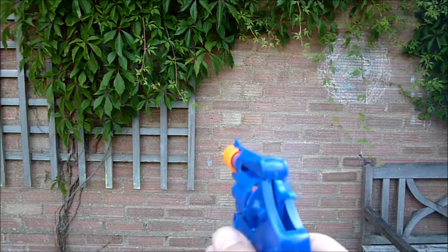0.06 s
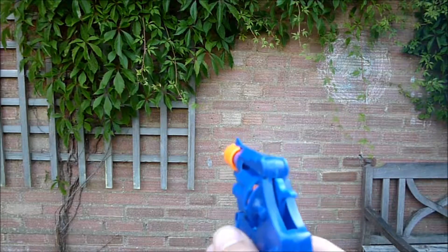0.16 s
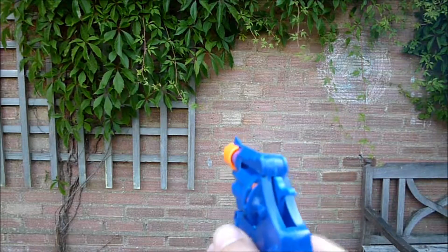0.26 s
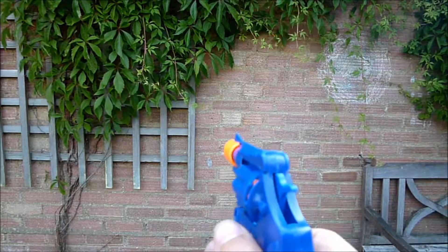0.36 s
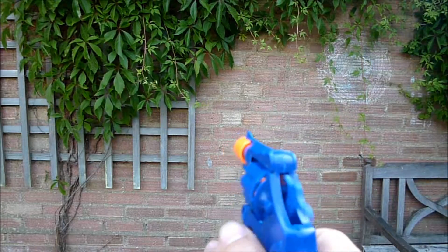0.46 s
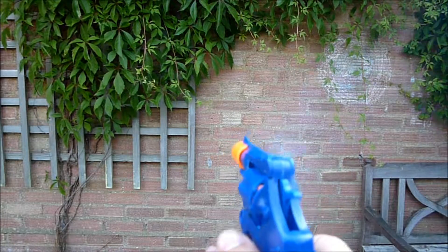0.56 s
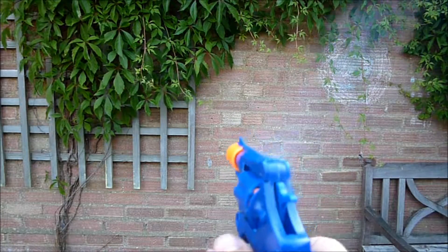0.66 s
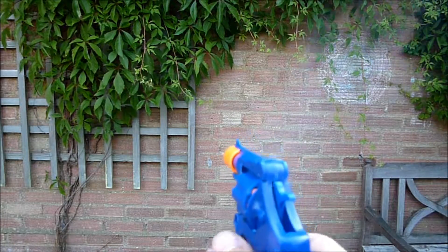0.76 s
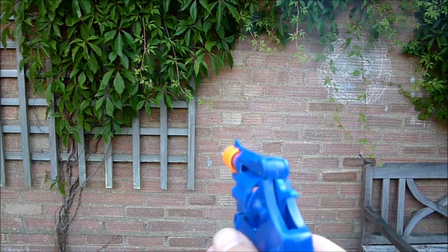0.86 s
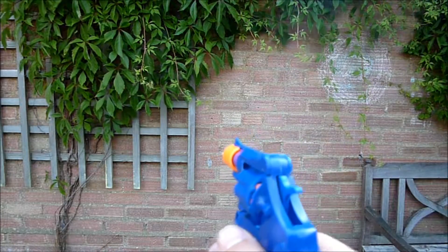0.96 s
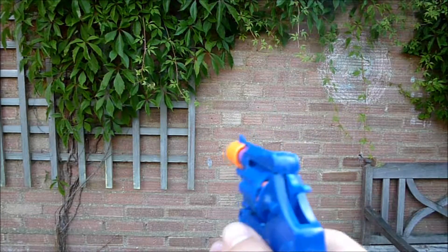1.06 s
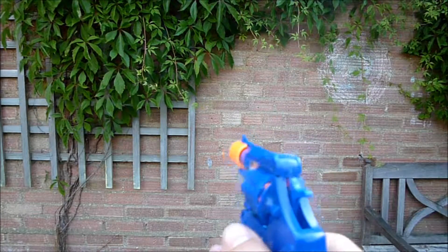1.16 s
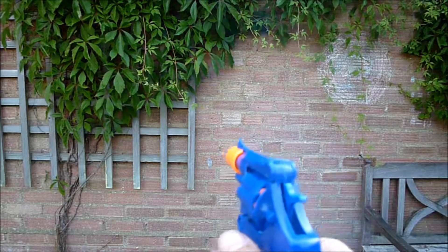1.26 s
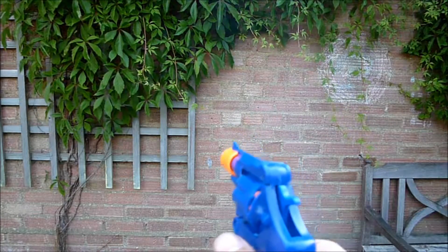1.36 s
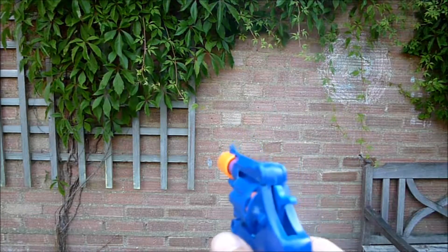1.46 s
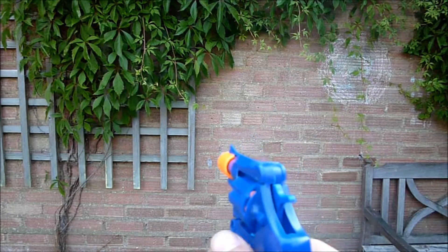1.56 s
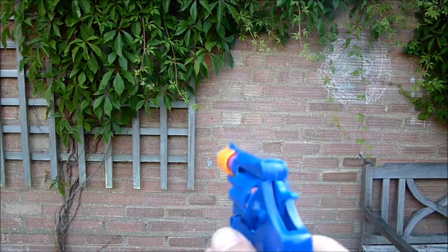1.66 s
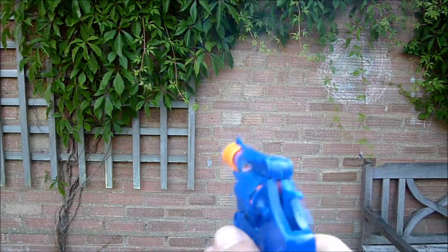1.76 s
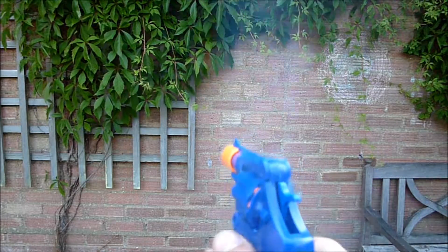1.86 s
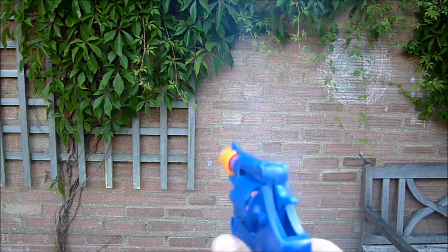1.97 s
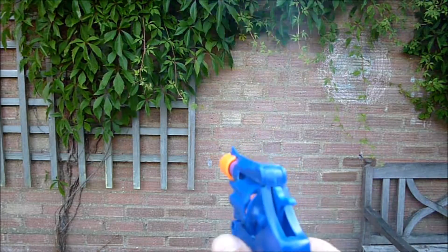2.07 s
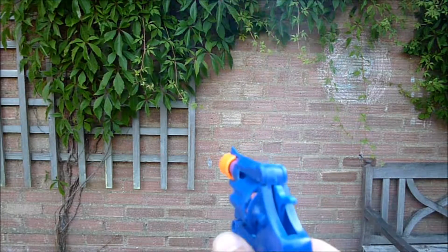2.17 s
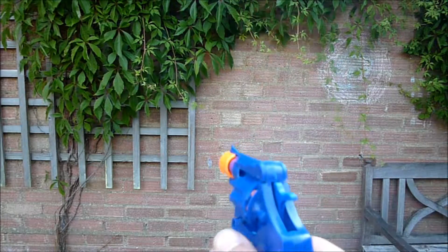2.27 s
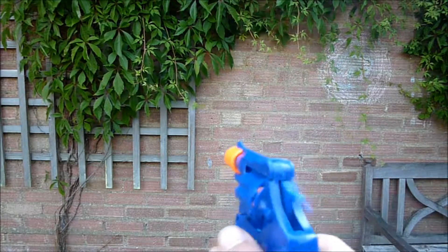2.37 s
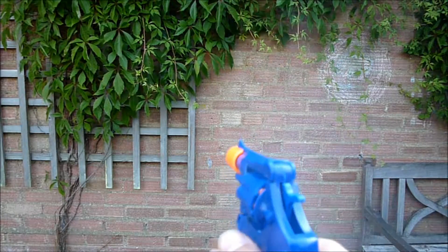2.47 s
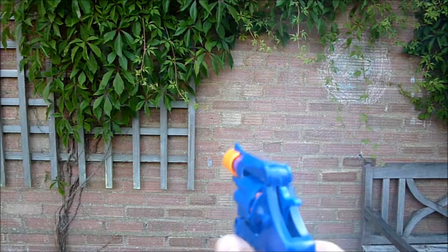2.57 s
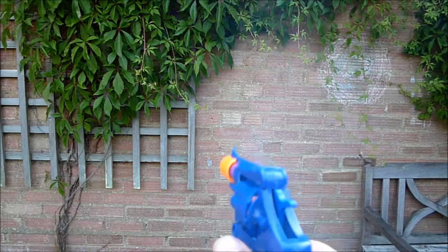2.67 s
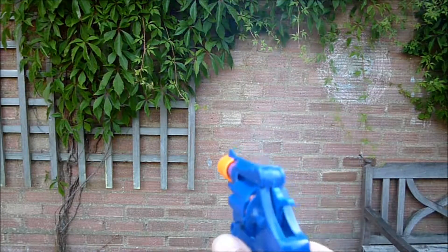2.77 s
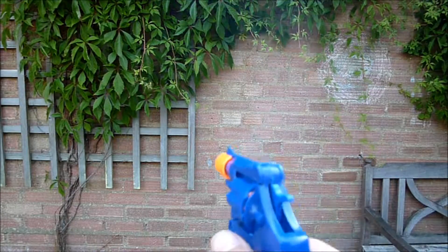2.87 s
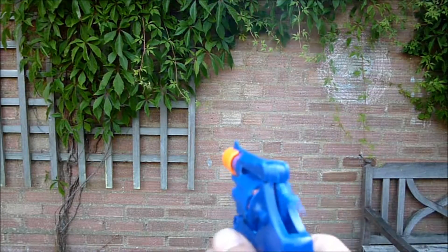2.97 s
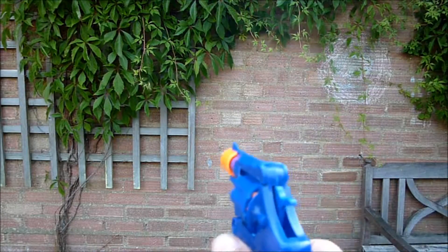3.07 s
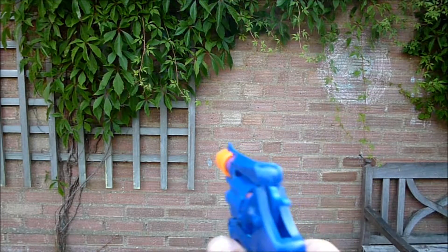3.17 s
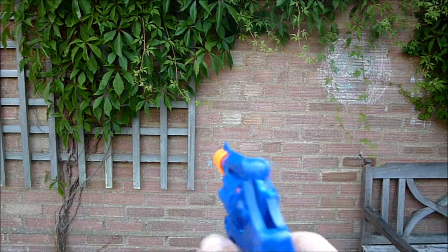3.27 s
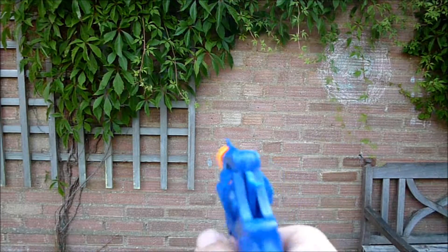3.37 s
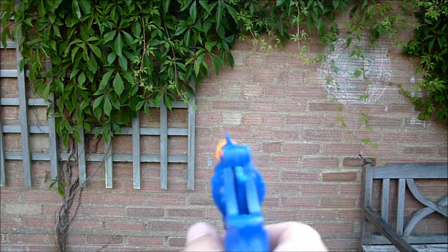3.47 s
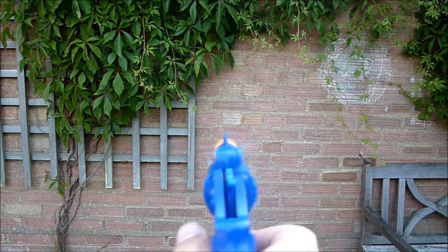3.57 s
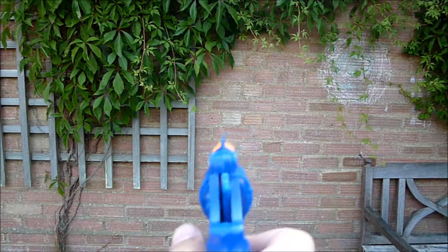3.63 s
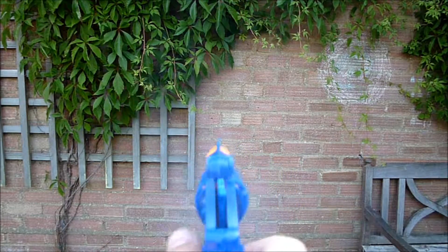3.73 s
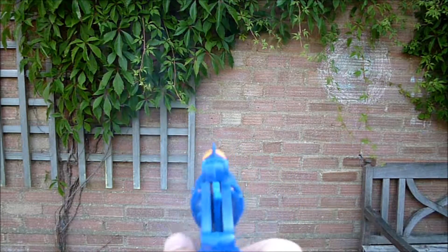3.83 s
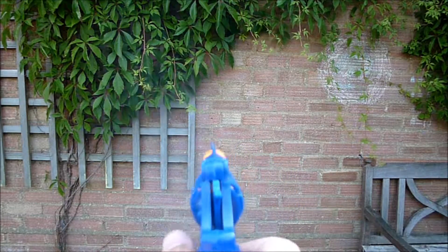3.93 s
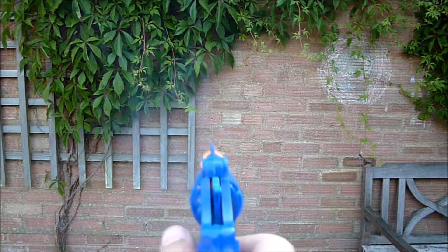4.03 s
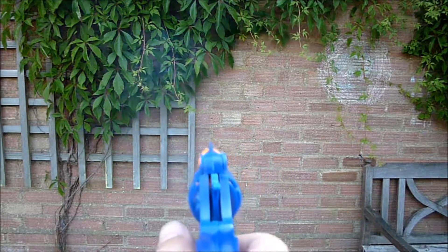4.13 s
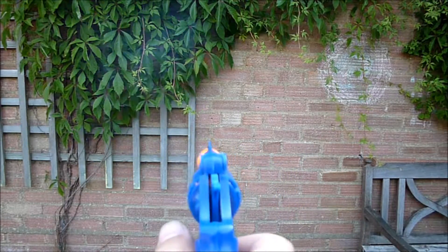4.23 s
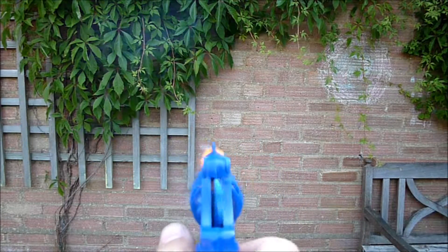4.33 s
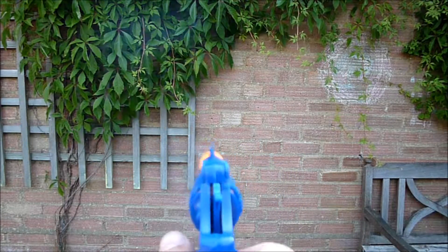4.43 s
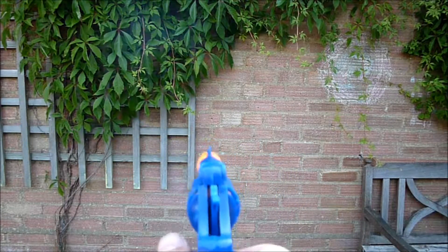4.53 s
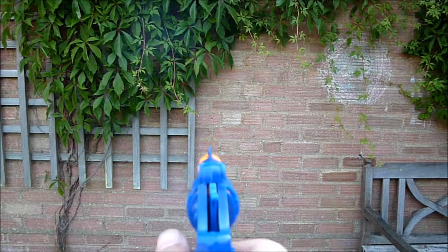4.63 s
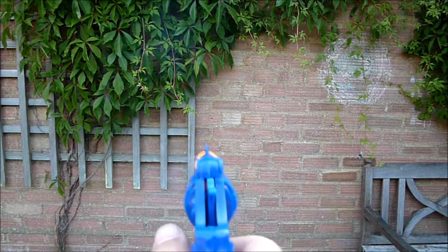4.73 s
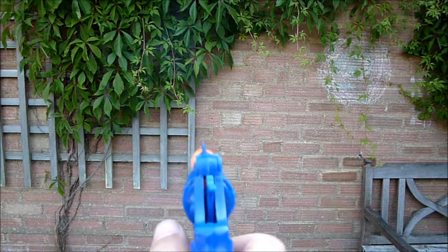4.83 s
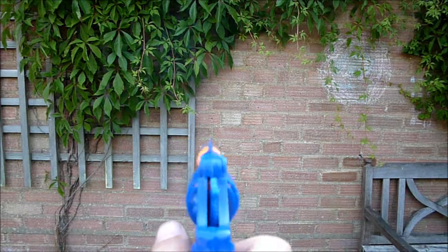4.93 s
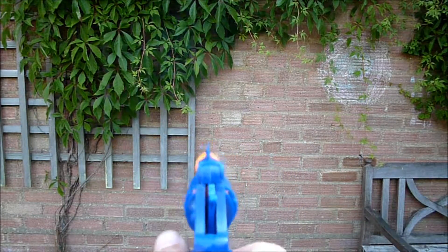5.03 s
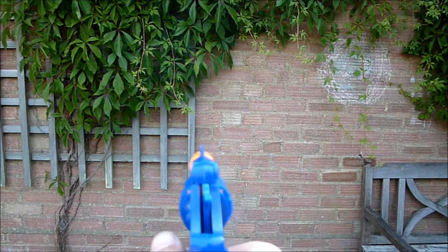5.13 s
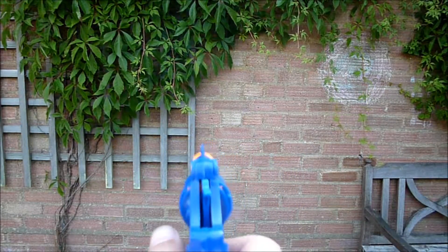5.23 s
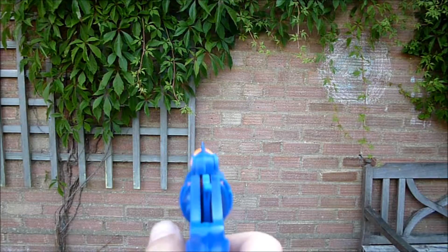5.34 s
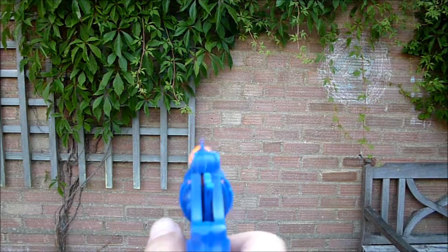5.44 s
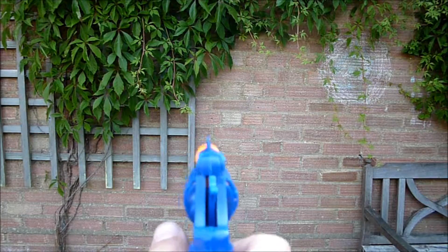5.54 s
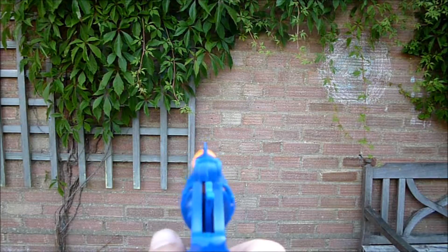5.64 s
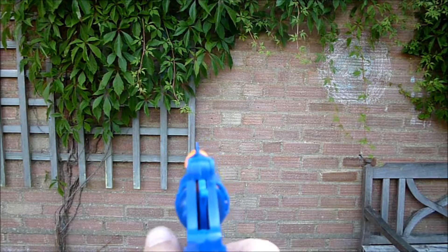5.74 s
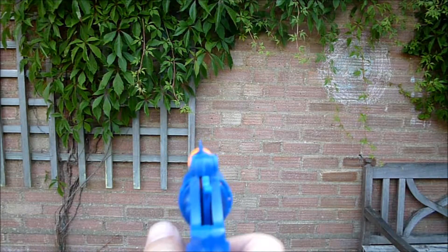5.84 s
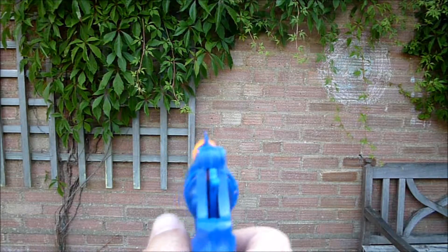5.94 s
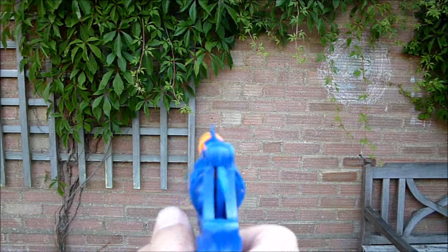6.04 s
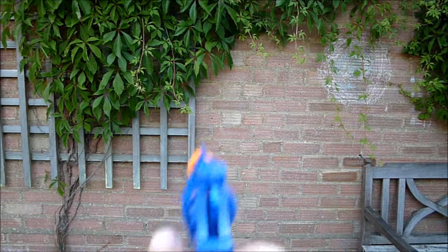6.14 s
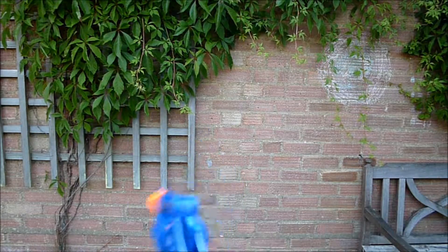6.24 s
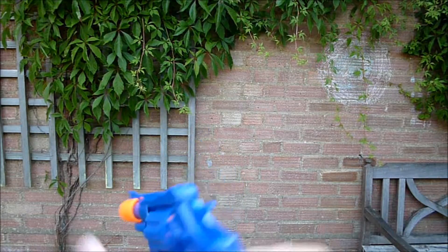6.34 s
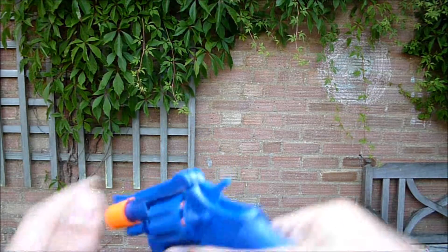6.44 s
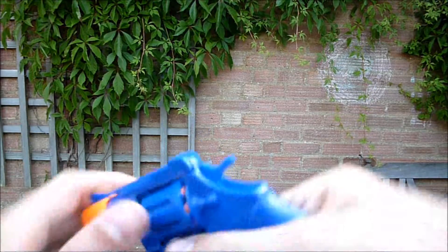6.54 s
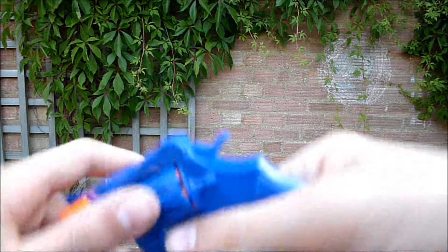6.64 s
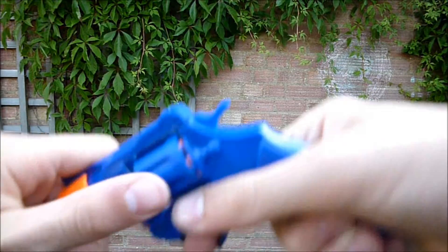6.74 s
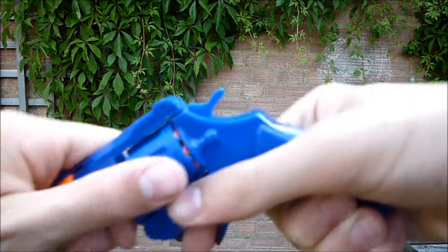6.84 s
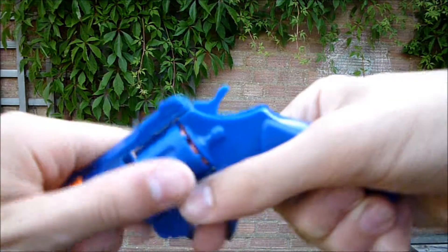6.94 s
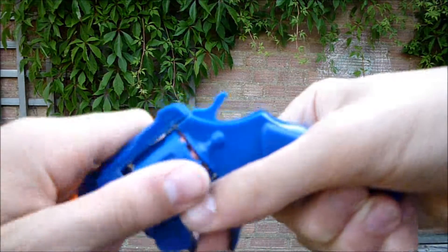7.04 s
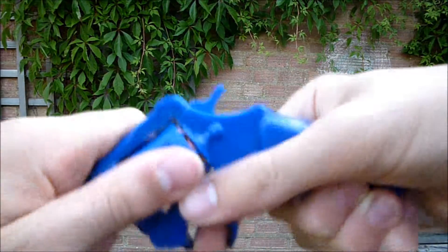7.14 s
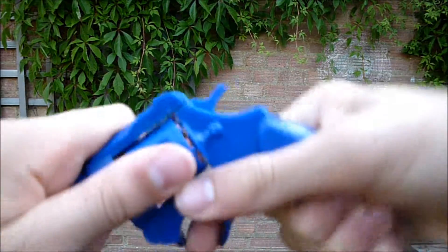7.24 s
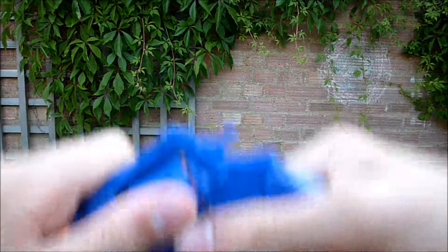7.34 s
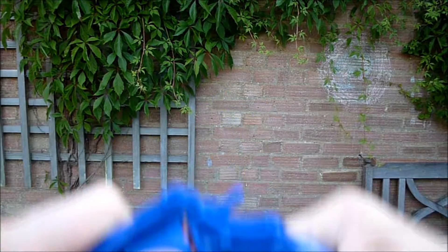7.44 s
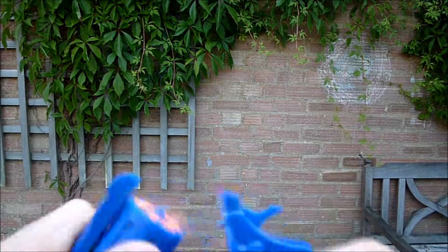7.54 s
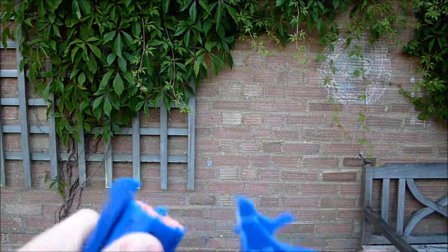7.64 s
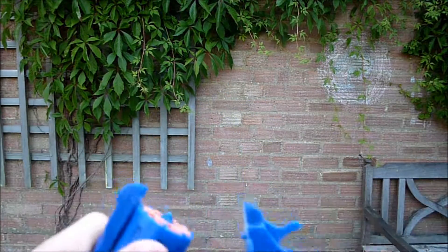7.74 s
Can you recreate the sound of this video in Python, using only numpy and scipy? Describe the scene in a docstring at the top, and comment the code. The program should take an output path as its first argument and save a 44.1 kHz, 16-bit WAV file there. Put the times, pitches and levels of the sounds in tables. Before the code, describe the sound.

A plastic toy cap revolver is fired right by the microphone in a quiet walled garden. At the very start, the echo of an earlier bang dies away. Sharp cracks follow at about 0.6, 1.2, 1.9 and 2.5 seconds, each briefly overloading the microphone with a low thump and ringing off the walls for about half a second. At 3.1 the hammer lands with only a bright plastic clack. One more cap bangs at 3.8. Four dud clacks follow at 4.4, 5.0, 5.6 and 6.2 seconds. About a fifth of a second after every pull, the trigger springs back with a softer short scrape and small clicks. After a pause, the gun snaps open at 7.6 seconds with a dry click and a brief hollow ring. Underneath lie a very faint low rush of outdoor air, steady hiss and a barely audible whine.

```python
"""In a walled garden, close to a small camera, a plastic toy cap revolver is fired ten times: five caps
bang, five are duds. At the start the echo of an earlier bang is still dying away. Each trigger pull turns
the cylinder, trips the hammer and springs back with a scrape and a click; at last the frame snaps open.
Every impact excites the frame's normal modes. The bangs overload the microphone for an instant,
then return by reflection from the ground and the walls."""
import sys
import numpy as np
from scipy import signal
from scipy.io import wavfile

SR = 44100
rng = np.random.default_rng(int(sys.argv[2]) if len(sys.argv) > 2 else 0)


def put_to_file(sound):
    """Save the sound as 16-bit audio at rate SR, in the file named by the first command-line argument."""
    columns = np.atleast_2d(sound).T  # one column per channel
    safe = np.clip(columns, -1, 1)
    whole_steps = np.round(safe * 32767)
    wavfile.write(sys.argv[1], SR, whole_steps.astype(np.int16))


N = 343980
T = np.arange(SR * 3 // 5) / SR
BRIEF = T[:SR // 10]

# Caps that fire. Each row: start in seconds, crack level in dB, burn time in seconds, thump level in dB,
# base level of the echoes in dB, their tilt in dB per octave, boost of the chamber's whistle in dB.
CAP_SHOTS = [(-.13, -12, 0.0011, -10, -20.5, 0.5, 1), (0.5756, -16.5, 0.00047, -4, -30, 0, 11.5),
             (1.2453, -15.5, 0.00046, -5, -26.5, 1, 4.5), (1.8596, -13.5, 0.00032, -6.5, -25, 0, 0.5),
             (2.4943, -15.5, 0.0016, 0.5, -22, 0.5, -1), (3.7808, -17.5, 0.0013, -3.5, -21.5, 0, -0.5)]
# Spectra of a cap's crack and of its echoes. Each row: frequency in Hz, relative level in dB.
CRACK_SPECTRUM = [(100, 0), (500, 2), (1100, 6), (1800, 4.5), (3000, -4.5), (5000, -5.5), (8000, -9.5)]
ECHO_SPECTRUM = [(60, -4), (150, -1), (350, -3.5), (550, 0.5), (850, 2), (1300, 0), (2000, 0.5), (2800, -3),
                 (3600, -9.5), (4400, -9), (5500, -8.5), (6800, -3.5), (8000, -15)]
# The garden's late ring. Each row: frequency in Hz, reverberation time (t60) in seconds.
GARDEN_T60 = [(100, 0.2), (400, 0.083), (900, 0.61), (2000, 0.68), (4000, .55), (7500, 0.51)]
# Spectra of outdoor air and of the camera's hiss. Each row: frequency in Hz, relative level in dB.
AIR_SPECTRUM = [(30, 1), (90, 3.5), (200, 1.5), (350, -3), (600, -7.5), (1400, -13.5), (2500, -21.5),
                (8000, -32)]
HISS_SPECTRUM = [(59, -39), (100, -17.5), (210, -5.5), (367, -15.5), (440, -17), (1010, -13.5), (1420, -15),
                 (1640, -14.5), (3450, -16), (7500, -18), (9750, -49), (16500, -120)]
# The floor from which the rush of air swells back. Each row: time in seconds, level in dB.
AIR_FLOOR = [(0, -62.5), (.55, -66), (.9, -69.5), (5.3, -69), (7.8, -71)]
# The camera's faint whine. Each row: frequency in Hz, level in dB.
WHINE_TONES = [(441, -79), (2665, -83), (3112, -83.5), (3553, -81.5), (6223, -88.5), (6665, -80)]
# Trigger releases. Each row: start in seconds, scrape level in dB, pawl delay in seconds, pawl level
# in dB, stop delay in seconds, stop level in dB, boost of the stop's low modes in dB.
TRIGGER_RELEASES = [(.063, -32, .0455, -41.5, .0769, -28.5, 12), (.785, -33, .029, -45, .054, -35, 11),
                    (1.464, -37.5, .037, -39.5, .0585, -36.5, 13), (2.063, -43, .024, -48.5, .0588, -27, 1),
                    (2.673, -38.5, .033, -44.5, .0518, -42, 12), (3.278, -35.5, .039, -40, .0619, -36, 12),
                    (3.994, -38, .049, -36.5, .0644, -47.5, 10),
                    (4.635, -36, .0418, -41.5, .0607, -34.5, 8),
                    (5.222, -37.5, .0364, -45, .0635, -37.5, 10), (5.802, -36, .053, -51, .1215, -35, 6),
                    (6.349, -40.5, .0395, -43.5, .2204, -33, 10)]
# Modes of the plastic frame; the one near 3 kHz is the air in the chamber.
# Each row: frequency in Hz, relative level in dB, t60 in seconds.
FRAME_MODES = [(774, -24, 0.042), (915, -15, 0.039), (1363, -27.5, .012), (1960, -11, .026),
               (2450, -18.5, 0.0086), (3070, 0, 0.014), (4130, -5, 0.014), (4900, -3, 0.012),
               (5500, -1.5, 0.007), (6330, -0.5, 0.0085), (6850, -3.5, .008)]
# Trigger pulls. Each row: hammer landing in seconds, hammer level in dB, pawl lead in seconds,
# pawl level in dB, catch lead in seconds, catch level in dB.
TRIGGER_PULLS = [(0.5734, -14, .1, -55, .0318, -33), (1.2448, -23, .098, -53, .0103, -42),
                 (1.8592, -23.5, .09, -60, .009, -43), (2.4948, -21, .082, -48, .0135, -35),
                 (3.0959, -15.5, .1, -60, .007, -33), (3.7811, -23, .12, -46.5, .0141, -22.5),
                 (4.4325, -16, .084, -52.5, .0096, -23), (5.0234, -18, .09, -53, .0087, -23.5),
                 (5.6115, -16, .0776, -40, .01, -24), (6.1701, -18, .0937, -41, .01, -45)]
# The frame snaps open. One row: start in seconds, click level in dB, ring level in dB.
FRAME_LATCH = (7.5827, -16.5, -21)

GROUND_S = .0098  # travel time down to the paving and back


def amp(db):
    """Decibels to amplitude ratio."""
    return 10 ** (np.asarray(db) / 20)


def read(points, hz):
    """Interpolation on a log-frequency axis."""
    f, value = np.transpose(points)
    return np.interp(np.log(hz + 1), np.log(f), value)


def unit_rms(x):
    """Normalisation to a mean power of 1."""
    return x / np.sqrt(np.mean(x ** 2) + 1e-20)


def burst(x, db):
    """Normalisation to the energy of 2 ms at the given level."""
    return amp(db) * x / np.sqrt(np.sum(x ** 2) / (.002 * SR) + 1e-20)


def add(mix, s, sound):
    """Superposition: a sound joins the mix at s seconds."""
    at = round(s * SR)
    sound = sound[max(-at, 0):]
    part = mix[max(at, 0):][:len(sound)]
    part += sound[:len(part)]


def colour(x, points, size=2048):
    """Minimum-phase filtering with the given spectrum of (Hz, dB) points."""
    log_gain = np.log(amp(read(points, abs(np.fft.fftfreq(size, 1 / SR)))))
    taps = np.fft.ifft(np.exp(np.conj(signal.hilbert(log_gain)))).real
    return signal.oaconvolve(x, taps)[:len(x)]


def chatter(decay_s, rise_s=0.0001):
    """Random excitation by rough contact or burning powder: exponentially decaying noise of energy 1."""
    x = rng.standard_normal(len(BRIEF)) * np.exp(-BRIEF / decay_s) * (1 - np.exp(-BRIEF / rise_s))
    return x / np.linalg.norm(x)


def overload_thump(db, rise_s, recover_s, leak, coupling_hz=155):
    """Overload drags the microphone's bias down; high-pass coupling turns that step into a low thump."""
    bias = -amp(db) * np.minimum(T / rise_s, 1) * np.exp(-T / recover_s)
    return signal.lfilter(*signal.butter(2, coupling_hz, "high", fs=SR), bias) + leak * bias


def garden(early_t60=0.23, late_db=-13, spiky=0.15):
    """Scattering from walls and bench gives an impulse response: a dense cluster, then a longer ring."""
    reflections = rng.standard_normal(len(T))
    reflections *= np.exp(spiky * np.repeat(rng.standard_normal(len(T)), 20)[:len(T)])
    hz, t, spectrum = signal.stft(reflections, SR, nperseg=256)
    early = amp(-60 * t / early_t60)
    late = amp(late_db - 60 * t / read(GARDEN_T60, hz)[:, None])
    return signal.istft(spectrum * np.hypot(early, late), SR, nperseg=256)[1][:len(T)]


def caps(bounce_db=6, bounce_thump_db=15, walls_s=0.013, walls_db=8):
    """Combustion sends out a pressure pulse that jams the microphone until the ground echo arrives."""
    sound, mic_gain = np.zeros(N), np.ones(N)
    for s, crack_db, burn_s, thump_db, echo_db, tilt_db, whistle_db in CAP_SHOTS:
        blast = 0.82 * chatter(burn_s)
        blast[0] -= 1
        add(sound, s, burst(colour(blast, CRACK_SPECTRUM), crack_db))
        # a cap that burns longer gives a deeper thump, directly and off the ground
        add(sound, s, overload_thump(thump_db, rise_s=1.46 * burn_s, recover_s=.02, leak=0.02))
        add(mic_gain, s + burn_s, -.97 * signal.windows.tukey(round(.0085 * SR), .1))
        tone = [(hz, db + tilt_db * np.log2(hz / 2000) + whistle_db * (abs(hz - 3600) < 400))
                for hz, db in ECHO_SPECTRUM]
        bounce = burst(colour(chatter(0.0053), tone), echo_db + bounce_db)
        thump = overload_thump(echo_db + bounce_thump_db, rise_s=.0017, recover_s=9.8 * burn_s, leak=.2)
        add(sound, s + GROUND_S, bounce)
        add(sound, s + GROUND_S, thump)
        add(sound, s + walls_s, burst(colour(garden(), tone), echo_db + walls_db))
    return sound, mic_gain


def outdoor_air(swell_db_per_s=15):
    """Amplitude modulation of a low rush: it sinks at each shot, dud or latch snap, then swells back."""
    t = np.arange(N) / SR
    cracks = np.array([CAP_SHOTS[0][0]] + [pull[0] for pull in TRIGGER_PULLS] + [FRAME_LATCH[0]])
    since_crack = t - cracks[np.searchsorted(cracks, t) - 1]
    level_db = np.interp(t, *np.transpose(AIR_FLOOR)) + swell_db_per_s * since_crack
    return unit_rms(colour(rng.standard_normal(N), AIR_SPECTRUM)) * amp(level_db)


def camera_noise(hiss_db=-67):
    """Self-noise of the camera: broadband hiss and a whine of steady pure tones."""
    t = np.arange(N) / SR
    hiss = amp(hiss_db) * unit_rms(colour(rng.standard_normal(N), HISS_SPECTRUM))
    whine = sum(amp(db) * np.sin(2 * np.pi * (hz * t + rng.random())) for hz, db in WHINE_TONES)
    return hiss + np.sqrt(2) * whine


def slide(db, slips_per_s=1500, stroke_s=.015):
    """Stick-slip friction of plastic on plastic makes a short bright scrape."""
    slips = rng.standard_normal(len(BRIEF)) * (0.15 + (rng.random(len(BRIEF)) < slips_per_s / SR))
    stroke = np.minimum(BRIEF / 0.00098, 1) * np.exp(-(BRIEF / stroke_s) ** 2)
    spectrum = [(500, -42), (2500, -26), (3100, -8), (3700, -15.5), (4800, -7), (5600, 0),
                (6400, -2.5), (7500, -18.5)]
    return burst(colour(slips * stroke, spectrum), db)


def frame(force, bass_db, chamber_db, tilt_db, damping):
    """Modal resonance: the place of contact shares out the energy, and a pressing part damps the ring."""
    hz, db, t60 = np.array(FRAME_MODES).T[:, :, None]
    db = db + tilt_db * np.log2(hz / 3000) + bass_db * (hz < 1100) + chamber_db * (abs(hz - 3150) < 400)
    detune = 1 + .012 * rng.standard_normal(hz.shape)  # the grip shifts each mode a little
    decay = amp(-60 * damping * BRIEF / t60)
    modes = decay * np.sin(2 * np.pi * (hz * detune * BRIEF + rng.random(hz.shape)))
    rings = signal.fftconvolve(force[None], modes, axes=1)[:, :len(BRIEF)]
    return (amp(db) * rings / np.linalg.norm(rings, axis=1, keepdims=True)).sum(0)


def knock(db, bass_db, chamber_db, tilt_db, rattle, rattle_s, tick, damping=1):
    """Impact of plastic parts: an impulse and brief chatter drive the frame, beside a dry contact tick."""
    force = rattle * chatter(rattle_s)
    force[0] += 1
    tick_spectrum = [(300, -15.5), (1500, -6.5), (3000, -0.5), (5500, -3), (8000, -6.5)]
    contact = colour(chatter(rattle_s), tick_spectrum)
    ring = frame(force, bass_db, chamber_db, tilt_db, damping)
    return burst(burst(ring, 0) + tick * burst(contact, 0), db)


def pawl(db):
    """A light impact: the pawl drops over one tooth of the cylinder's ratchet."""
    return knock(db, bass_db=-5, chamber_db=-3.5, tilt_db=-3, rattle=0.47, rattle_s=0.0025, tick=0.29)


def stop(db, bass_db):
    """The trigger's impact on its stop excites the frame's low modes."""
    return knock(db, bass_db, chamber_db=-3, tilt_db=-1.5, rattle=0.8, rattle_s=.0012, tick=0.3)


def catch(db, firm_db=-23):
    """Sudden release of the hammer: the harder the catch slips off, the brighter the snap."""
    tilt_db = 6 + .7 * (db - firm_db)
    return knock(db, bass_db=-3, chamber_db=-3, tilt_db=tilt_db, rattle=1.5, rattle_s=.0009, tick=0.5)


def trigger():
    """Ratchet action: a pull turns the cylinder and trips the catch; let go, the trigger springs back."""
    out = np.zeros(N)
    for s, _, pawl_s, pawl_db, catch_s, catch_db in TRIGGER_PULLS:
        add(out, s - pawl_s, pawl(pawl_db))
        add(out, s - catch_s, catch(catch_db))
    for s, scrape_db, pawl_s, pawl_db, stop_s, stop_db, bass_db in TRIGGER_RELEASES:
        add(out, s, slide(scrape_db))
        add(out, s + pawl_s, pawl(pawl_db))
        add(out, s + stop_s, stop(stop_db, bass_db))
    return out


def hammer(swing_s=0.0024, swing_db=-26.5):
    """Damped impact: the hammer clatters down, overloads the microphone and stays pressed on the cap."""
    blows, thumps = np.zeros(N), np.zeros(N)
    for s, db, *_ in TRIGGER_PULLS:
        swing = knock(swing_db, bass_db=.5, chamber_db=4, tilt_db=-1, rattle=1.5, rattle_s=.0055, tick=.7)
        landing = knock(db, bass_db=2, chamber_db=13, tilt_db=4, rattle=.97, rattle_s=.0006, tick=.2,
                        damping=1.5)
        add(blows, s - swing_s, swing)
        add(blows, s, landing)
        add(thumps, s, overload_thump(db + 6, rise_s=0.00087, recover_s=0.029, leak=0.11))
    return blows, thumps


def latch():
    """Impulsive excitation: the frame snaps open at the microphone with a dry click and a brief ring."""
    s, click_db, ring_db = FRAME_LATCH
    out = np.zeros(N)
    spectrum = [(60, 5), (300, -1.5), (900, 4), (1400, 0.5), (2000, -2.5), (2750, 2.5), (3400, -1),
                (4300, 2.5), (6500, -4.5), (8000, -9)]
    click = colour(signal.unit_impulse(len(BRIEF)), spectrum)
    ring = knock(ring_db, bass_db=15.5, chamber_db=-2.5, tilt_db=3, rattle=.94, rattle_s=.00065, tick=.61)
    add(out, s, burst(click, click_db))
    add(out, s + .0004, ring)
    return out


def scene(wet_db=-21, ground_db=-26, latch_wet=0.42):
    """Direct and reflected sound superpose at the microphone; each bang briefly mutes the lockwork."""
    blows, thumps = hammer()
    bangs, mic_gain = caps()
    snap = latch()
    lockwork = blows + trigger()
    # the chamber's note is strong close by but carries poorly across the garden
    carry = [(500, -1), (1400, -1), (2000, 3.5), (2600, -1), (3100, -2.5), (3800, 2.5), (4900, 1.5),
             (7500, 2.5)]
    radiated = colour(lockwork + latch_wet * snap, carry)
    walls = garden(early_t60=0.27, late_db=-20.5, spiky=.22)
    echoes = np.zeros(N)
    add(echoes, GROUND_S, amp(wet_db) * signal.oaconvolve(radiated, walls / np.linalg.norm(walls)))
    add(echoes, GROUND_S, amp(ground_db) * lockwork)
    return ((lockwork + echoes) * mic_gain + snap + bangs + thumps + outdoor_air() + camera_noise())[None]


def record(dry):
    """Linear filtering in the camera: a narrow notch and a band limit, plus a constant offset."""
    notch_hz, edge_hz, resting_offset = 4400, 7850, .023
    notched = signal.lfilter(*signal.iirnotch(notch_hz, Q=50, fs=SR), dry)
    lowpass = signal.firwin(141, edge_hz, window=("kaiser", 7), fs=SR)
    return signal.oaconvolve(notched, lowpass[None], "same") + resting_offset


dry = scene()
out = record(dry)
put_to_file(out)
```